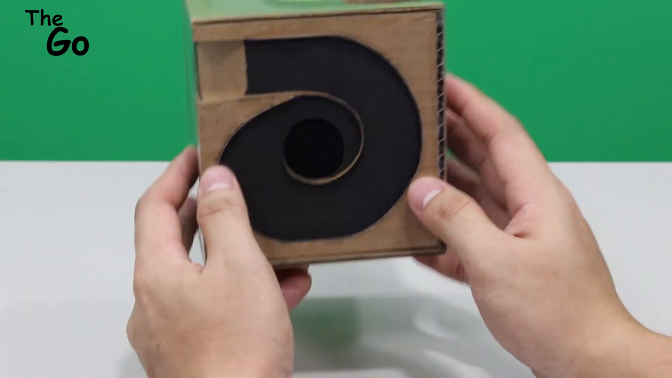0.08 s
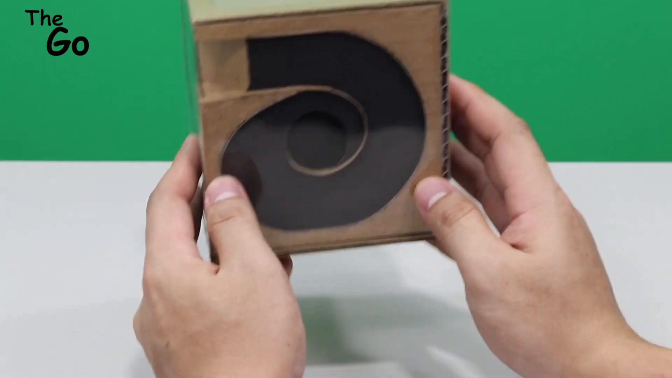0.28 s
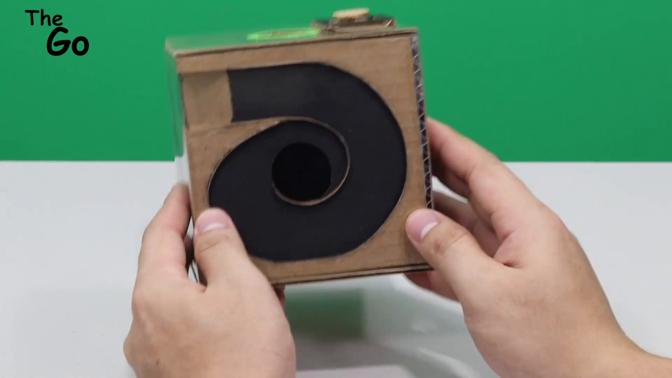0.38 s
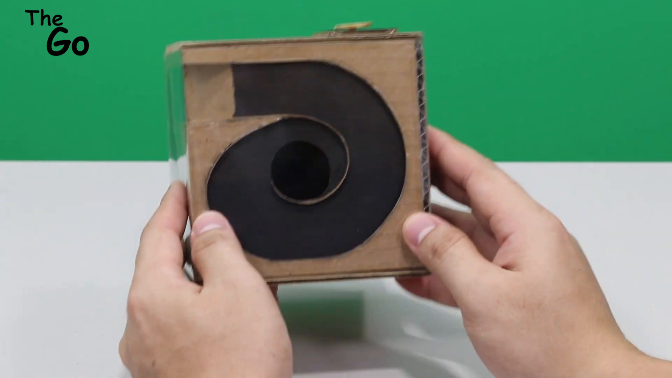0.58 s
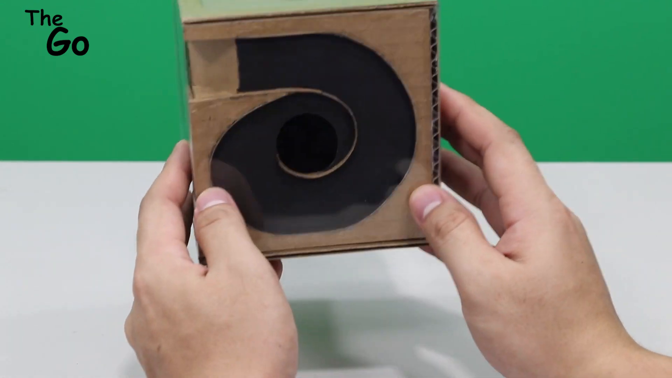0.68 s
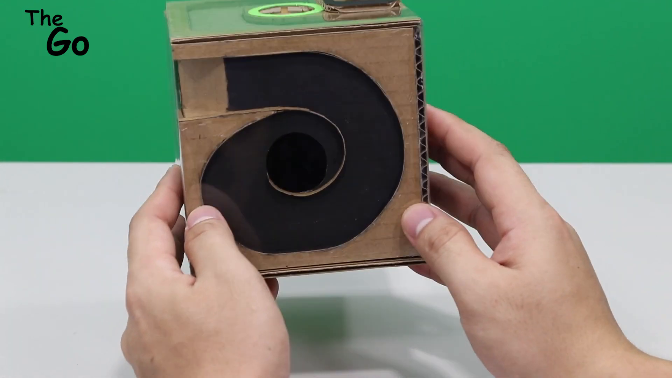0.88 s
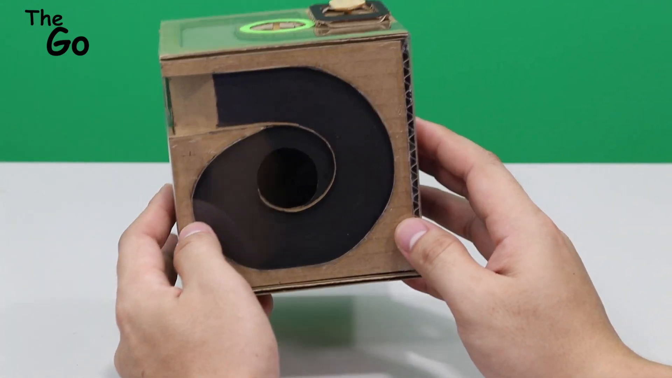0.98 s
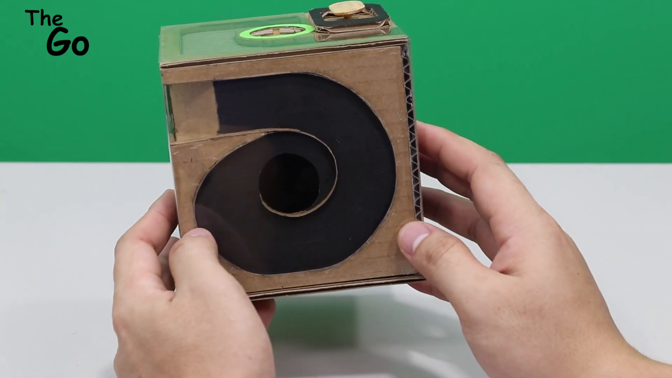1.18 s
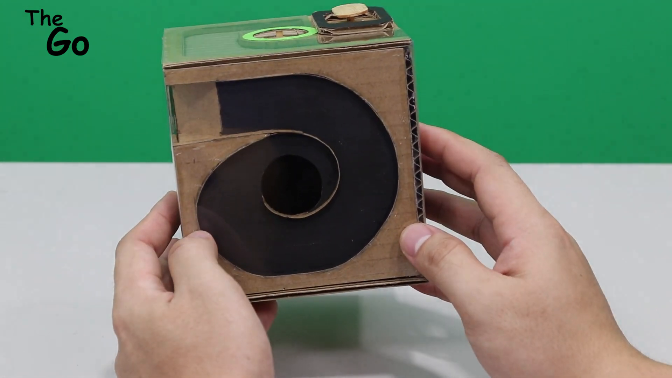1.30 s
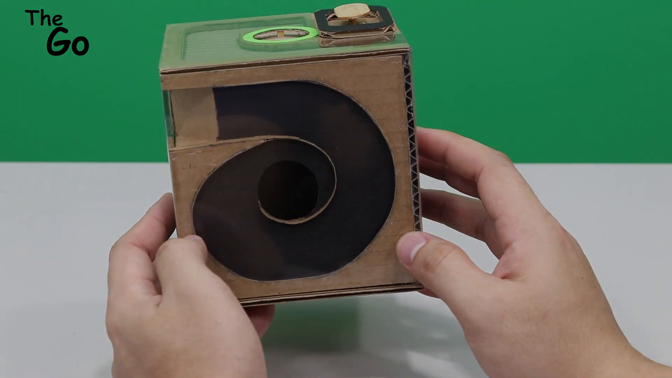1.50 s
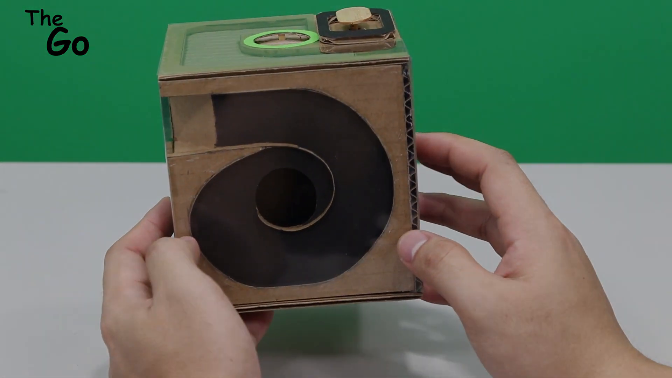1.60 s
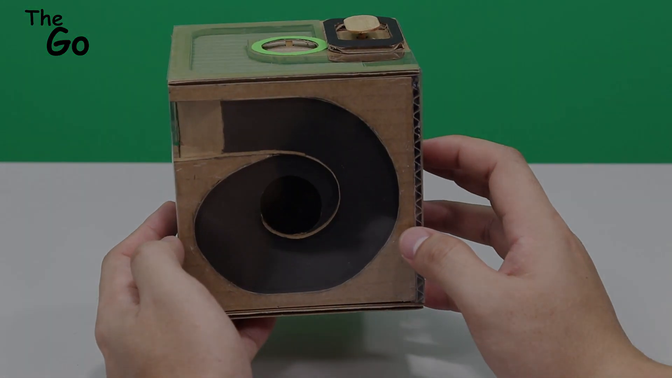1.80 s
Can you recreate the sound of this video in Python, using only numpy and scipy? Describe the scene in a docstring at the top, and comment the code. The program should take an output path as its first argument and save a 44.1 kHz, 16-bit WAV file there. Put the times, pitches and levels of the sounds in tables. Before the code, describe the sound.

After a faint brush of fingers on card, a coin clatters and rolls inside a hand-held box, woody knocks and thin metallic ringing until a few soft taps end it, heard close up indoors with short echo.

```python
"""Fingers brush the card of a hand-held box in a small room, over a quiet noise floor: all are shaped noise.
Then a coin runs round a spiral track inside, knocking in about five main bursts of clicks that ring the box.
In between it rolls: dense random contacts rumble the panels, a slack one too, and the metal rings thinly.
Two low thumps jolt the box, the rim chinks once, a faint ring hangs on, and a few soft taps end the run."""
import sys
import numpy as np
from scipy import signal
from scipy.fft import rfft, irfft, next_fast_len
from scipy.io import wavfile
from scipy.ndimage import uniform_filter1d, minimum_filter1d

SR = 44100
rng = np.random.default_rng(int(sys.argv[2]) if len(sys.argv) > 2 else 0)


def unload_audio(sound):
    """Save the sound as a 16-bit wav file, at the path given as the first command line argument."""
    columns = np.transpose(np.atleast_2d(sound))
    # keep every value between -1 and 1, then stretch to whole-number steps
    steps = np.round(np.clip(columns, -1, 1) * 32767)
    wavfile.write(sys.argv[1], SR, steps.astype(np.int16))


N = 83790
T = np.arange(N) / SR   # time in seconds


def from_db(db):
    """Turn decibels into a gain."""
    return 10 ** (np.asarray(db) / 20)


def unit(x):
    """Scale to an rms of 1."""
    return x / np.sqrt(np.mean(x ** 2) + 1e-20)


def level(rows):
    """Gain over time, drawn through points of seconds and dB; silent outside them."""
    return from_db(np.interp(T, *np.transpose(rows), left=-np.inf, right=-np.inf))


def at_hz(points, hz):
    """Read a table between its points, on a log-frequency axis."""
    table_hz, values = np.transpose(points)
    return np.interp(np.log(hz + 1e-3), np.log(table_hz), values)


def colour(x, points, keep_energy=True):
    """Filter to a given spectrum without sounding early; can keep the energy of a click."""
    size = 2 * next_fast_len(N)
    gain = from_db(at_hz(points, np.arange(size // 2 + 1) * SR / size))
    if keep_energy:
        gain = unit(gain)
    # folding the cepstrum forward in time gives the filter its minimum phase
    cepstrum = irfft(np.log(gain))
    cepstrum[1:size // 2] *= 2
    cepstrum[size // 2 + 1:] = 0
    response = np.exp(rfft(cepstrum))
    return irfft(rfft(x, size) * response)[..., :N]


def high_pass(x, order, hz):
    """Take away what lies below a frequency."""
    return signal.sosfilt(signal.butter(order, hz, "high", fs=SR, output="sos"), x)


def ring(x, hz, t60):
    """A resonator: a unit click sets off a sine that starts at height 1 and falls 60 dB in t60 seconds."""
    decay = from_db(-60 / (t60 * SR))
    turn = 2 * np.pi * hz / SR   # radians per sample
    return signal.lfilter([0, np.sin(turn)], [1, -2 * decay * np.cos(turn), decay * decay], x + 1e-18)


def click(s):
    """One unit click at s seconds."""
    return 1. * (np.arange(N) == int(s * SR))


def spread(mid, side):
    """Make left and right from two signals: alike in the bass, apart in the treble."""
    # Level of side against mid. Each row: frequency in Hz, level in dB.
    width = [(60, -0.5), (150, -19.5), (300, -13.5), (700, -9.5), (1400, -5), (2800, -1.5), (6000, -1),
             (14000, 0.5)]
    return mid + colour(side, width, keep_energy=False) * np.array([[1], [-1]])


def hiss(tone):
    """Smooth stereo noise of a given colour, rms 1."""
    return unit(colour(spread(*rng.standard_normal((2, N))), tone))


def noise_floor():
    """Quiet steady noise under everything."""
    # Its spectrum. Each row: frequency in Hz, relative level in dB.
    floor_colour = [(25, -8), (55, -7.5), (100, -6), (170, -1), (400, -3), (1000, -11.5), (2500, -21),
                    (6000, -29), (9000, -24), (12500, -30.5), (15500, -46)]
    return from_db(-53) * hiss(floor_colour)


def room(x):
    """Echoes too dense to tell apart: noise that dies at its own rate in each octave."""
    # How long the echo takes to fall 60 dB. Each row: frequency in Hz, time in seconds.
    room_t60 = [(150, 1), (400, 0.68), (900, 0.62), (2200, 0.59), (5000, 0.7), (9000, 0.32), (15000, 0.35)]
    ROOM_DB, ONSET_S = -9, 0.0077
    white = rng.standard_normal((2, 2, N))
    tail = 0
    edges = np.geomspace(70, 18000, 9)
    for k, band in enumerate(zip(edges, edges[1:])):
        octave = signal.butter(2, band, "band", fs=SR, output="sos")
        noise = signal.sosfilt(octave, white[k % 2])
        t60 = at_hz(room_t60, np.sqrt(np.prod(band)))
        tail = tail + noise * from_db(-60 * T / t60)
    onset = 1 - np.exp(-(T / ONSET_S) ** 2)
    tail = unit(spread(*tail) * onset) / np.sqrt(N)
    return from_db(ROOM_DB) * signal.fftconvolve(x, tail, axes=-1)[:, :N]


def brushing():
    """Fingers slide on the card: coloured noise that swells and fades."""
    # How loud the fingers are. Each row: time in seconds, level in dB.
    brush_level = [(0, -49.5), (.043, -63.5), (.05, -41), (.07, -45.5), (.095, -52.5), (.15, -45.5),
                   (.19, -59), (.222, -47.5), (.24, -82.5)]
    # Spectrum of the brushing. Each row: frequency in Hz, relative level in dB.
    brush_colour = [(100, -24), (400, 3.5), (850, -4), (2000, -10), (5000, -21), (9000, -19.5),
                    (15500, -27)]
    return level(brush_level) * hiss(brush_colour)


def thumps():
    """The whole box is jolted and answers with a short low tone."""
    # The jolts. Each row: time in seconds, level in dB.
    jolts = [(.481, -38), (.9085, -26)]
    push = sum(from_db(db) * click(s) for s, db in jolts)
    return ring(push, hz=69.4, t60=0.027)


def bumps():
    """Dense random contacts of uneven size, pushing either way."""
    BUMPS_PER_S, BUMP_SPREAD_DB = 1800, 2.8   # average rate; typical extra size
    sizes = from_db(BUMP_SPREAD_DB * np.minimum(rng.exponential(1, N), 4))
    sizes = sizes * rng.choice([-1, 1], N)
    return sizes * (rng.random(N) < BUMPS_PER_S / SR)


def rubbed(modes):
    """Ringing tones (modes) kept going by the rolling contact; rms 1."""
    rub = spread(bumps(), bumps())
    return unit(sum(from_db(db) * unit(ring(rub, hz, t60)) for hz, db, t60 in modes))


def box(force):
    """The panels pass every contact on directly and ring on at their own modes."""
    # Modes of the panels and the air inside. Each row: frequency in Hz, level in dB over the direct sound,
    # time to fall 60 dB in seconds.
    box_modes = [(430.6, -1, 0.137), (587, 4, 0.15), (669.6, 8.5, 0.2), (750, 5, 0.6), (777, -1.5, 0.18),
                 (910, 3.5, 0.29), (995, -16.5, 0.45), (1140, -1, .1), (1288, 4, 0.17), (1450, -25, 0.13),
                 (1653, -7, 0.027), (2200, 5, 0.059)]
    sound = force
    for hz, db, t60 in box_modes:
        velocity = np.gradient(ring(force, hz, t60), axis=-1) / (2 * np.pi * hz / SR)
        per_peak = 2 * np.log(1000) / (t60 * SR)   # brings the peak of the resonance to about 1
        sound = sound + from_db(db) * per_peak * velocity
    return sound


def slack_panel():
    """Midway along the track the coin crosses a slack panel, which adds a deeper rumble."""
    # Modes of the panel. Each row: frequency in Hz, relative level in dB, time to fall 60 dB in seconds.
    slack_modes = [(237, -12, 0.04), (310, -13.5, 0.23), (384.2, -5, 0.32), (433.3, 3.5, 0.17),
                   (490, 2, 0.25)]
    # Strength of the rumble. Each row: time in seconds, level in dB.
    slack_level = [(.23, -75), (.42, -37), (.52, -33), (.66, -29.5), (.76, -31.5), (.88, -26), (1.0, -36.5),
                   (1.1, -40.5), (1.22, -33.5), (1.38, -69)]
    return level(slack_level) * high_pass(rubbed(slack_modes), 6, 189)


def rolling():
    """The rim bumps over the grain of the card and the panels rumble."""
    # Strength of the rolling. Each row: time in seconds, level in dB.
    roll_level = [(.22, -75), (.25, -26), (.30, -25.5), (.38, -20.5), (.465, -30.5), (.52, -28), (.60, -21),
                  (.655, -29.5), (.74, -31), (.85, -23.5), (.96, -27.5), (1.02, -22), (1.17, -23),
                  (1.23, -30), (1.30, -42.5), (1.43, -36.5), (1.5, -61)]
    # Spectrum of the rolling. Each row: frequency in Hz, relative level in dB.
    roll_colour = [(40, -49.5), (120, -57), (200, -11), (400, -11), (700, 5), (1100, -3.5), (2000, -11.5),
                   (3200, -18), (5000, -27), (8500, -19.5), (12000, -31), (15500, -47)]
    rumble = unit(colour(box(spread(bumps(), bumps())), roll_colour))
    return level(roll_level) * rumble + slack_panel()


def coin():
    """The rubbed rim keeps the metal ringing; it catches once with a chink, then comes free and rings out."""
    # The coin's own modes, in two families. Each row: frequency in Hz, relative level in dB,
    # time to fall 60 dB in seconds.
    low_modes = [(8357, 0, .3), (8450, -5, .02), (8571, 0, .3), (8660, -6, .2)]
    high_modes = [(14380, -3, .04), (14470, -2, .04), (14565, 0, .1)]
    # How strongly each family is rubbed into ringing. Each row: time in seconds, level in dB.
    low_level = [(.23, -65), (.26, -37), (.37, -37.5), (.46, -59), (.5, -33.5), (.57, -27.5), (.655, -29),
                 (.69, -56), (.75, -34.5), (.865, -30.5), (.89, -41), (1.0, -43.5), (1.025, -35),
                 (1.07, -34.5), (1.10, -43), (1.19, -34), (1.27, -53.5), (1.45, -93)]
    high_level = [(.23, -80), (.28, -48), (.37, -45), (.46, -55), (.5, -34), (.56, -31), (.65, -37),
                  (.69, -46), (.72, -36), (.86, -38), (.9, -57.5), (1.005, -66), (1.025, -30), (1.07, -45),
                  (1.10, -63), (1.18, -60), (1.24, -93)]
    sing = level(low_level) * rubbed(low_modes) + level(high_level) * rubbed(high_modes)
    chink = from_db(-6) * ring(click(.669), hz=8680, t60=0.0071)
    last_ring = from_db(-48) * ring(click(1.181), hz=8640, t60=1.0)
    # the coin sounds only in the treble
    return high_pass(sing + chink + last_ring, 2, 4000)


def blows(rows, tone):
    """Each blow is a click and a scatter of rebounds; hard contacts are brighter, yielding walls deeper."""
    SCATTER_DB, SCATTER_T60_S = 1.5, 0.046   # the blow rebounds inside the box
    HARD_HZ, GIVE_HZ = 3000, 460             # treble lies above the first, bass below the second
    SPOT_DB, SPOT_Q = 1.5, 6.6               # the struck spot rings briefly
    BOX_LOW_HZ = 130                         # small panels give off little below this
    size = SR // 10
    force = np.zeros((2, N))   # mid and side
    soft = signal.butter(1, HARD_HZ, fs=SR)
    thin = signal.butter(2, GIVE_HZ, "high", fs=SR)
    for s, db, treble_db, bass_db, hz in rows:
        scatter = rng.standard_normal((2, size)) * from_db(-60 * T[:size] / SCATTER_T60_S)
        blow = from_db(SCATTER_DB) * unit(scatter) / np.sqrt(size)
        blow[0, 0] -= 1   # the first click
        dull = signal.lfilter(*soft, blow)
        blow = dull + from_db(treble_db) * (blow - dull)
        bass_gain = from_db(bass_db)
        blow = bass_gain * blow + (1 - bass_gain) * signal.lfilter(*thin, blow)
        spot = signal.lfilter(*signal.iirpeak(hz, SPOT_Q, fs=SR), blow)
        blow = blow + from_db(SPOT_DB) * spot
        start = int(s * SR)
        force[:, start:start + size] += from_db(db) * blow
    return high_pass(colour(box(spread(*force)), tone), 3, BOX_LOW_HZ)


def taps():
    """Light taps of the coin as it settles."""
    # Each row: start in seconds, relative strength in dB, hardness as treble in dB, give of the wall as bass
    # in dB (next to nothing here), pitch of the struck spot in Hz.
    tap_rows = [(1.322, -14, 1, 0.0056, 1220), (1.3275, -18.5, 1, 0.0033, 1560),
                (1.333, -18, -8, 0.0097, 1140), (1.361, -16, -10, 0.0053, 950),
                (1.369, -18.5, 8.5, 0.0042, 1190), (1.3955, -17, -18, 0.0087, 890),
                (1.403, -12, -1, 0, 910), (1.4165, -18, -14, 0.0081, 1200), (1.4275, -21.5, 1, 0, 930)]
    # Spectrum of the taps. Each row: frequency in Hz, relative level in dB.
    tap_colour = [(100, -44), (400, -27), (700, 3), (1000, 6), (1600, -1.5), (2600, -14), (5000, -31),
                  (9000, -39), (15500, -59)]
    return from_db(9.5) * blows(tap_rows, tap_colour)


def knocks():
    """The coin knocks against the walls and bounces."""
    # Each row: start in seconds, relative strength in dB, hardness as treble in dB, give of the wall as bass
    # in dB, pitch of the struck spot in Hz.
    knock_rows = [(.2298, -0.5, -6, -6, 700), (.2423, 5, 3, -15, 1640), (.2462, -4, 1, -24.5, 1350),
                  (.2493, -3.5, 2, -9, 1600), (.2555, -12.5, 10, -15, 1370), (.2655, -12.5, 8, -20, 750),
                  (.351, -14, -11, -16, 750), (.4806, -0.5, 6.5, 5, 556), (.4895, -13.5, 14.5, 1, 670),
                  (.4925, -17, 11.5, 3.5, 590), (.5057, -1.5, 3, -0.5, 656), (.5118, -8.5, 5, 2.5, 1240),
                  (.604, -16, -9.5, -2, 830), (.669, -6.5, -8, 7.5, 1740), (.6728, -9.5, 15, -1.5, 1140),
                  (.6778, 2.5, 2, 2, 1045), (.686, -13.5, -10, -11, 1180), (.705, -3.5, 6, -1.5, 630),
                  (.7105, -7.5, -1.5, 4, 1130), (.793, -10, -16, -12, 660), (.812, -14, 3.5, -13, 660),
                  (.849, -17, -3, 14.5, 406), (.8735, -1.5, -11, 2.5, 770), (.879, -8.5, 8, 0, 1370),
                  (.892, -5.5, -12, 0, 490), (.9085, -1.5, 5.5, 4.5, 1220), (.919, -6.5, 7, 2, 600),
                  (.9325, -8, -2, -3, 1730), (1.0583, -10, -17.5, 4, 700), (1.0707, -2, 2.5, -22, 1080),
                  (1.078, -4.5, 1, -14, 1210), (1.0875, -5.5, -23, 5, 670), (1.0986, -6, 8.5, -5, 960),
                  (1.1025, -6.5, -8, -5.5, 1200), (1.138, -13, -18, -11, 800), (1.149, -8, 6.5, -30, 1210),
                  (1.1575, -8.5, 2, -22, 1190), (1.181, -12.5, 4, -10, 1170)]
    # Spectrum of the knocks. Each row: frequency in Hz, relative level in dB.
    knock_colour = [(40, -55), (110, -46.5), (210, -13), (400, -3), (620, -1), (1250, 0), (1900, -6),
                    (2800, -13), (3700, -15.5), (5000, -27), (8000, -22), (12000, -32.5), (15500, -40)]
    return from_db(7) * blows(knock_rows, knock_colour)


def scene():
    """Coin, box and fingers in the room, over a quiet floor."""
    PAN_DB = -0.07   # added to the left, taken from the right
    near = brushing() + rolling() + coin() + taps() + knocks()
    near = near * from_db([[PAN_DB], [-PAN_DB]])
    return noise_floor() + room(near) + thumps() + near


def record(dry):
    """A fast limiter holds the hardest knocks at about full scale; then the top is cut."""
    CLIP_LEVEL, LIMIT_S, CUTOFF_HZ = 1.0, .002, 15600
    size = max(int(LIMIT_S * SR), 1)
    needed = np.minimum(1, CLIP_LEVEL / (np.abs(dry) + 1e-9))
    gain = uniform_filter1d(minimum_filter1d(needed, size), size)
    top_cut = signal.ellip(10, .1, 70, CUTOFF_HZ, fs=SR, output="sos")
    return signal.sosfilt(top_cut, dry * gain)


dry = scene()
out = record(dry)
unload_audio(out)
```